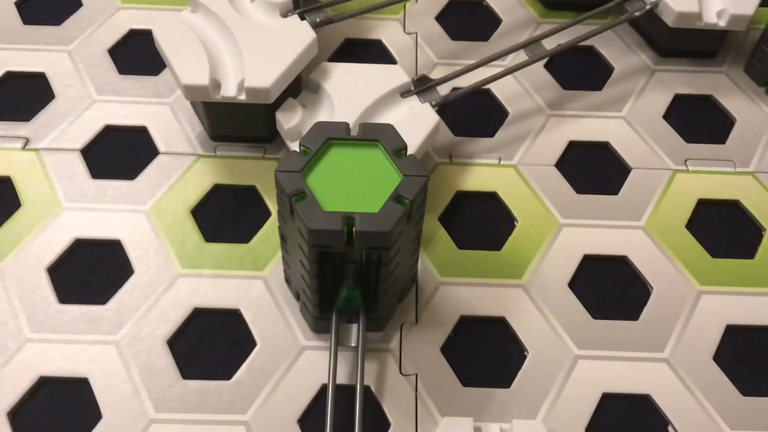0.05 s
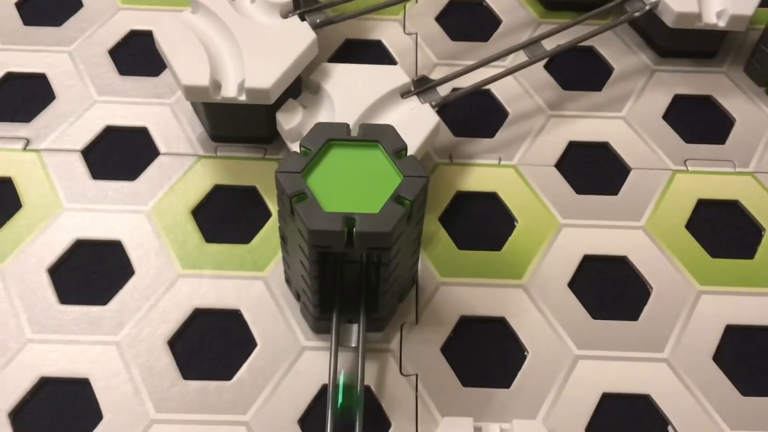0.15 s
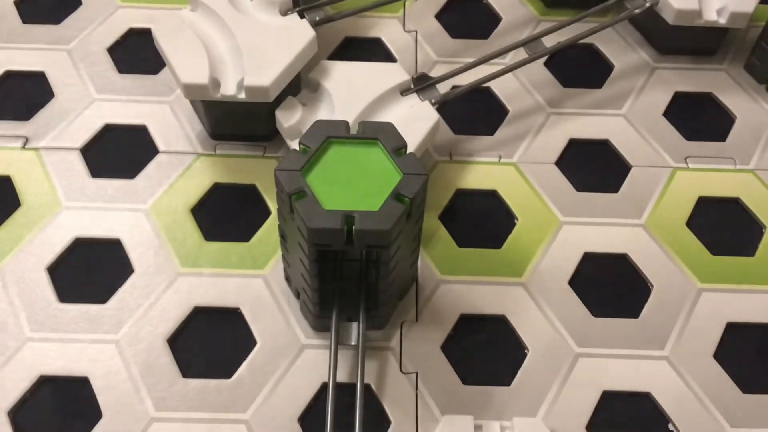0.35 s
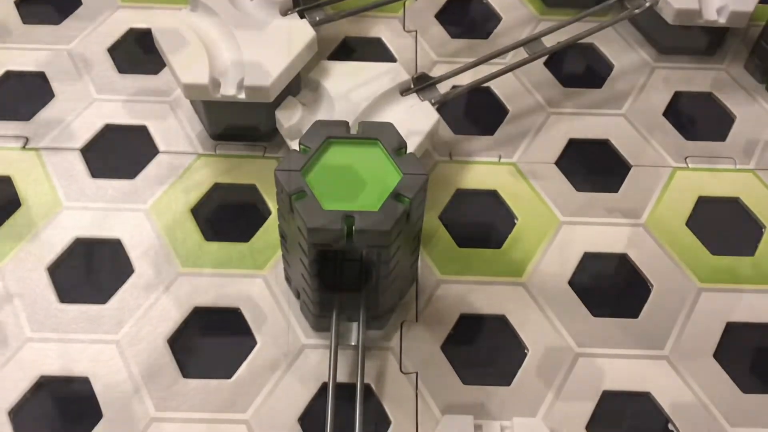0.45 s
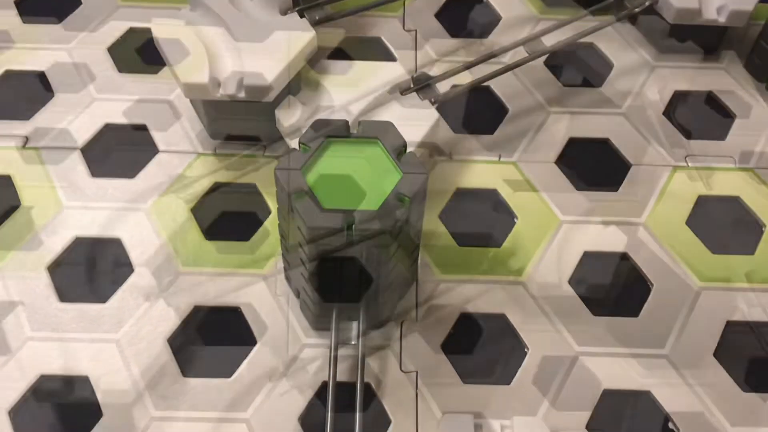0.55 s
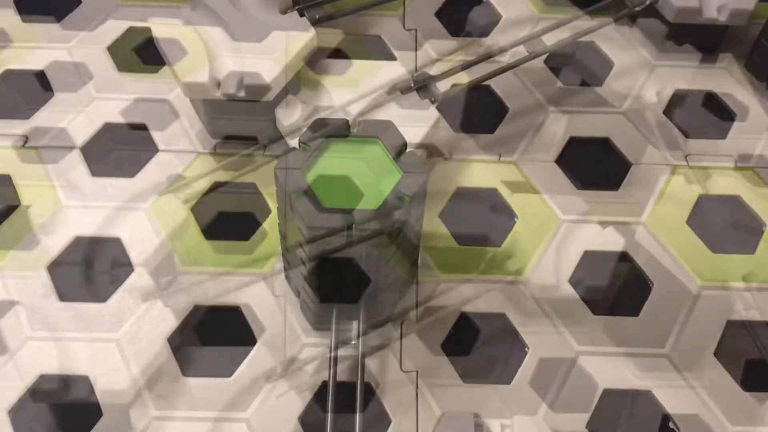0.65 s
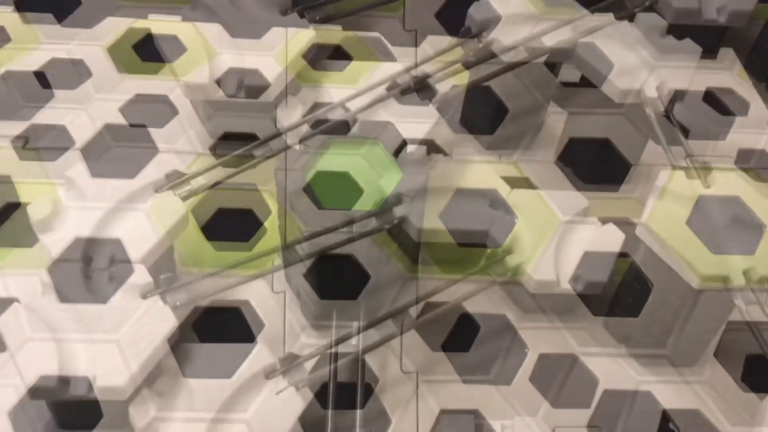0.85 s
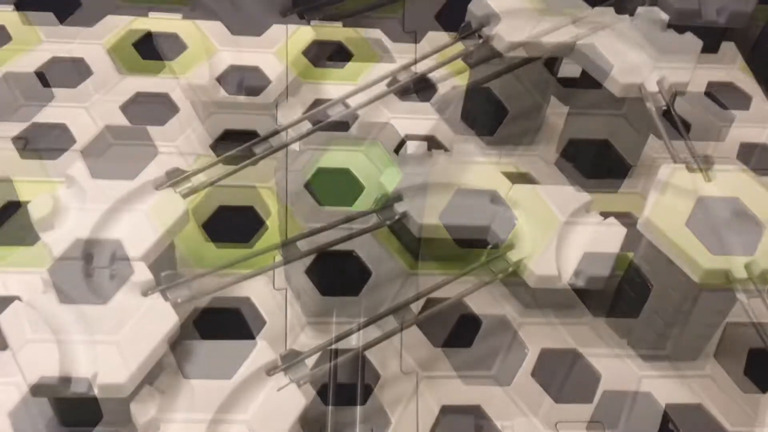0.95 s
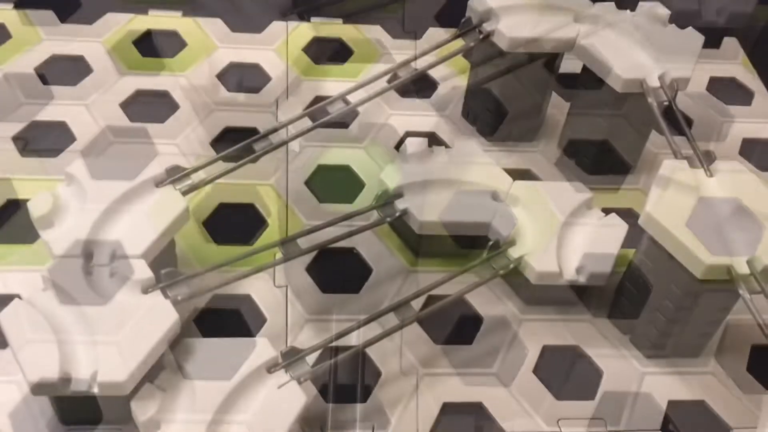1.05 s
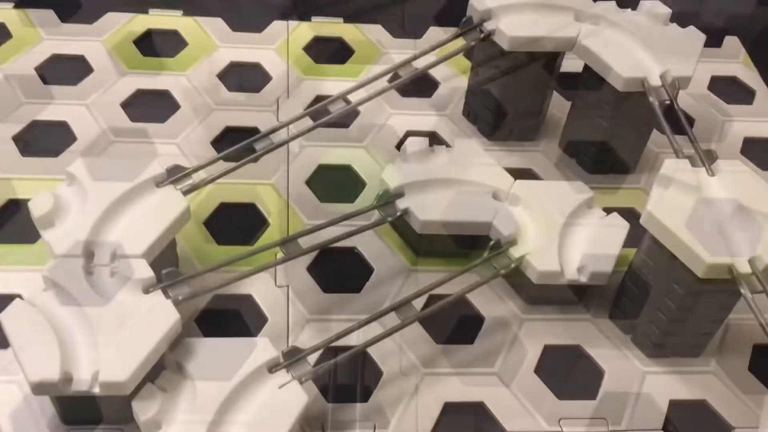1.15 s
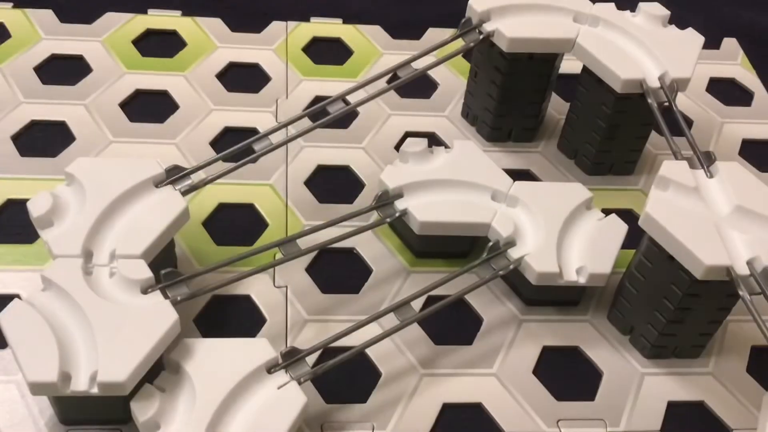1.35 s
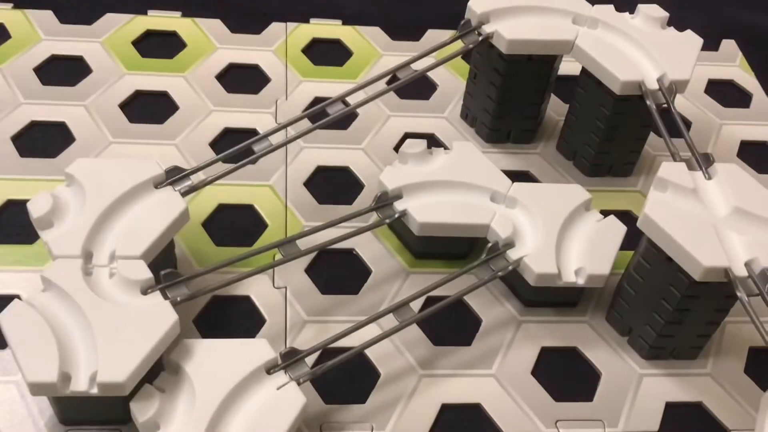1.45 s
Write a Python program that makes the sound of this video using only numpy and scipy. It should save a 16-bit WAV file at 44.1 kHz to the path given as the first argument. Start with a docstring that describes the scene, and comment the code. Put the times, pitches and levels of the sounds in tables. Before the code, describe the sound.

A marble rolls along a plastic track with a fine rattle and a quick run of sharp clacks. It settles with two faint ticks, leaving a low hum, heard close up in a small room.

```python
"""A marble clacks and rattles along a plastic track on a table in a small room.
Each hit on a tile or rail joint rings the plastic; tiny bumps under the marble make the fine rattle
and a hollow rumble. The rails sing softly as it rolls, and it settles with two faint ticks.
The room rings briefly after each clack. A faint whirr comes up late, and a low hum underneath
swells a little at the end."""
import sys
import numpy as np
from scipy import signal
from scipy.fft import rfft, irfft
from scipy.io import wavfile

SR = 44100
rng = np.random.default_rng(int(sys.argv[2]) if len(sys.argv) > 2 else 0)


def master_out(mix):
    """Clip the mix to full scale and print it as 16-bit PCM to the path in sys.argv[1]."""
    frames = np.transpose(np.atleast_2d(mix))
    ceiling = np.clip(frames, -1, 1)
    pcm = np.round(ceiling * 32767).astype(np.int16)
    wavfile.write(sys.argv[1], SR, pcm)


N = 66150
TIME = np.arange(N) / SR
WAVER_HZ = 22.2   # the whirr and the hum flutter in level below this rate


def clacks():
    """The marble hits joints and walls, each with its own ring and hardness."""
    # t/s, ring t60/s, hollow f/Hz, main f/Hz, upper f/Hz, upper resonance gain/dB,
    # then knock, clack, edge and tick level/dB (energy spread over 10 ms)
    hits = [(0.0667, 0.064, 1233, 2806, 3600, 7, -67.5, -52.5, -65, -95.5),
            (0.183, 0.027, 1327, 2227, 5070, 12, -49.5, -39.5, -41.5, -57),
            (0.2025, 0.033, 1250, 2290, 5030, 0.5, -59, -48, -59.5, -63),
            (.214, 0.023, 1470, 3080, 4730, 11.5, -53, -45, -39, -49.5),
            (0.2179, 0.011, 1340, 2880, 3316, 8, -55.5, -35.5, -51.5, -55),
            (0.229, 0.023, 828, 2636, 4140, 14.5, -34.5, -34.5, -39, -62),
            (0.2374, 0.026, 1183, 2490, 4126, 3.5, -54.5, -44.5, -56.5, -57.5),
            (0.282, .012, 1094, 2504, 4160, 3, -48.5, -48, -65, -80.5),
            (.2945, .02, 1195, 2697, 5110, 3, -65, -59.5, -66.5, -64.5),
            (0.3072, 0.012, 1604, 2702, 3572, 13.5, -39.5, -22.5, -39.5, -53),
            (0.3253, .006, 998.5, 2670, 3400, -1, -56.5, -35, -60, -81),
            (0.3341, .011, 1274, 2753, 3510, -2, -54, -30, -51, -76.5),
            (.3418, .012, 1590, 2707, 3680, -4, -60.5, -38.5, -68, -81),
            (0.3537, 0.018, 1204, 2840, 4636, 12.5, -39.5, -37.5, -40.5, -50),
            (0.4198, 0.011, 1180, 3850, 3920, 7.5, -68.5, -49.5, -53.5, -81.5),
            (0.4709, 0.011, 601, 2596, 3440, 3.5, -37, -21, -38.5, -45),
            (0.4827, 0.02, 1290, 2744, 3910, 8, -57.5, -35.5, -46.5, -65.5),
            (0.5363, 0.044, 683, 2950, 5230, 14, -54.5, -49, -72, -73.5),
            (0.7479, 0.021, 683, 2867, 5960, 16, -59, -47.5, -64.5, -81),
            (0.8652, 0.022, 675, 3100, 5950, 6, -65.5, -63.5, -87, -100)]
    out = np.zeros(N)
    for s, t60, hollow_hz, main_hz, upper_hz, upper_db, *levels_db in hits:
        add(out, s, clack(t60, hollow_hz, main_hz, upper_hz, upper_db, levels_db))
    return out


def clack(t60, hollow_hz, main_hz, upper_hz, upper_db, levels_db):
    """One contact snaps and rings the struck part and the track; hardness sets each register's level."""
    # modes of the plastic track: f/Hz, gain/dB, ring time as a multiple of the clack's
    track_modes = [(650, -4, 0.57), (1224, 4.5, 0.57), (1409, -5, 0.72), (2345, -5.5, 0.23), (2816, 2, 1.0),
                   (3230, -1.5, 1.2), (3780, -6, 0.68), (4230, -12, 0.21), (5030, 3, 1.2),
                   (5980, -16.5, 1.6), (8600, -7.5, 0.5), (13600, -19, .7)]
    # knock, clack, edge and tick registers: low f/Hz, high f/Hz
    registers = [(520, 2330), (2180, 3705), (4050, 6105), (7500, 17000)]
    build_up_s, attack_s, snap_t60, scatter_db = 0.000077, 0.00057, 0.007, 2.5
    t = TIME[:SR // 10]
    part_modes = [(hollow_hz, 3), (main_hz, 10.5), (upper_hz, upper_db)]   # f/Hz, gain/dB
    struck_part = sum(from_db(db) * np.sin(2 * np.pi * hz * t) for hz, db in part_modes)
    ring = struck_part * decay(t, t60) * (1 - np.exp(-t / build_up_s))
    for hz, db, length in track_modes:
        strength = from_db(db - scatter_db * rng.standard_normal()) * rng.choice([-1, 1])
        ring += strength * np.sin(2 * np.pi * hz * t) * decay(t, t60 * length)
    noise = band(rng.standard_normal(len(t)), 1390, 6000)
    weak_modes = from_db(15) * noise * decay(t, t60)
    snap = from_db(10) * noise * decay(t, snap_t60)
    ring = (ring + weak_modes + snap) * (1 - np.exp(-t / attack_s))
    voiced = sum(from_db(db) * rms_one(band(ring, low, high, order=4))
                 for (low, high), db in zip(registers, levels_db))
    return np.sqrt(1 / 10) * voiced   # 10 ms worth of energy in a 100 ms sound


def rolling():
    """Dense tiny bumps under the marble make the track rattle and its hollow tiles rumble."""
    # course of the roll: t/s, rattle level/dB, rumble level/dB
    levels = [(0, -58.5, -68.5), (.06, -62.5, -70.5), (.08, -55, -66), (.11, -57.5, -68.5),
              (.18, -55, -65.5), (.222, -44, -57.5), (.24, -38.5, -45), (.272, -50, -49.5), (.29, -50, -44),
              (.32, -51.5, -52.5), (.36, -56.5, -52.5), (.385, -58.5, -60.5), (.425, -59, -63.5),
              (.46, -63, -65), (.5, -51.5, -61.5), (.55, -58.5, -66.5), (.62, -68.5, -72),
              (.72, -100, -100)]
    # colour of the track's rattle: f/Hz, level/dB
    rattle = [(1200, -21.5), (1900, -1.5), (2350, -1.5), (2800, 5), (3600, 0.5), (4400, -10), (5100, -4.5),
              (6000, -14), (7000, -22.5), (10000, -35), (14500, -40.5)]
    # colour of the tiles' rumble: f/Hz, level/dB
    rumble = [(150, -16.5), (350, -10), (550, -11.5), (850, -4), (1050, -7.5), (1300, -3), (1600, -9.5),
              (2200, -6), (4000, -42.5)]
    bumps_per_s, spread_db = 2000, 1.5
    sizes = from_db(spread_db * np.minimum(rng.exponential(1, N), 4)) * rng.choice([-1, 1], N)
    bumps = sizes * (rng.random(N) < bumps_per_s / SR)
    rattle_db, rumble_db = in_time(levels)
    return from_db(rattle_db) * coloured(bumps, rattle) + from_db(rumble_db) * coloured(bumps, rumble)


def rail_rub():
    """The marble rubs a rail: a short swell of friction in one narrow, slightly rising resonance."""
    peak_s, width_s, peak_db, rise_hz_per_s = .417, .015, -48.5, 8100
    t = TIME - peak_s
    swell = from_db(peak_db) * np.exp(-.5 * (t / width_s) ** 2)
    return swell * resonance(3656 + rise_hz_per_s * t, band_hz=330)


def rail_song():
    """Rolling keeps one wavering resonance of the rails sounding until the marble leaves them."""
    # the rails' soft note: t/s, f/Hz, level/dB
    song = [(.06, 1210, -72.5), (.11, 1330, -62.5), (.14, 1260, -69), (.175, 1330, -61), (.22, 1330, -54.5),
            (.3, 1330, -110)]
    hz, db = in_time(song)
    return from_db(db) * resonance(hz, band_hz=190)


def rail_taps():
    """Two light taps of the marble leave the steel rail ringing thinly."""
    # taps on the rail: t/s, level/dB
    taps = [(0.7491, -61.5), (0.8666, -76)]
    # modes of the rail: f/Hz, gain/dB, t60/s
    modes = [(3230, -4, 0.15), (6200, -1, 0.03)]
    out, t = np.zeros(N), TIME[:SR // 4]
    ping = sum(from_db(db) * np.sin(2 * np.pi * hz * t) * decay(t, t60) for hz, db, t60 in modes)
    for s, db in taps:
        add(out, s, from_db(db) * ping)
    return out


def room(x):
    """Quick scatter from the table and tiles, then a diffuse tail that dies faster in the treble."""
    # the room's tail: f/Hz, level/dB, t60/s
    tail = [(300, 0.5, .75), (480, -9, 0.8), (802, -20.5, 0.435), (1500, -19, .5), (2550, -22, 0.79),
            (3320, -16, 0.41), (4600, -23.5, .42), (7900, -5, 0.17), (10600, -22, 0.29), (15000, -23, .2)]
    early_db, early_t60, fade_in_s = -17.5, .07, .005
    t, edges_hz = TIME[:SR * 3 // 4], np.geomspace(250, 16000, 13)
    early = from_db(early_db) * rms_one(decay(t, early_t60))
    white, response = rng.standard_normal((2, len(t))), 0
    for k, (low, high) in enumerate(zip(edges_hz, edges_hz[1:])):
        hz = np.sqrt(low * high)
        late = from_db(at_hz(tail, hz)) * rms_one(decay(t, at_hz(tail, hz, column=2)))
        response += band(white[k % 2], low, high) * np.hypot(late, early)
    response *= (1 - np.exp(-(t / fade_in_s) ** 2)) / np.sqrt(len(t))
    return signal.fftconvolve(x, response)[:N]


def whirr():
    """A faint, wavering whirr comes up near the end, and the table thrums under it."""
    # the whirr's rise: t/s, level/dB
    levels = [(.85, -87.5), (1.1, -79.5), (1.23, -78.5), (1.3, -76.5), (1.5, -77)]
    # colour of the whirr: f/Hz, level/dB
    colour = [(450, -19.5), (600, 11), (720, -5.5), (1200, -2), (1900, -9.5), (2200, -5), (2470, 1),
              (2850, -14.5), (5500, -17.5), (9500, -26.5)]
    thrum_above_db, waver_db = 19, 1.35
    db, = in_time(levels)
    thrum = from_db(thrum_above_db) * resonance(np.full(N, 130), band_hz=73)
    gain = from_db(db + waver_db * slow_noise(WAVER_HZ))
    return gain * (coloured(rng.standard_normal(N), colour) + thrum)


def room_tone():
    """A low room hum drifts in level under a steady faint hiss."""
    # colour of hum and hiss together: f/Hz, level/dB
    colour = [(22, -31.5), (38, -15.5), (55, -1), (90, 0.5), (150, -5), (250, -13), (340, -14.5),
              (440, -23.5), (600, -28), (800, -26.5), (1100, -30.5), (1800, -32), (2500, -35.5),
              (4300, -43.5), (6500, -49.5), (8300, -49.5), (11000, -55), (14000, -51), (15500, -62)]
    # the hum's drift: t/s, level/dB
    levels = [(0, -55.5), (.45, -58), (.58, -58.5), (.69, -62.5), (.85, -57.5), (1.0, -57.5), (1.12, -56.5),
              (1.26, -60), (1.31, -54.5), (1.42, -54.5), (1.5, -60.5)]
    crossover_hz, hiss_gain_db, waver_db = 443.7, -59.5, 0.96
    noise = coloured(rng.standard_normal(N), colour)
    hum = signal.sosfiltfilt(signal.butter(2, crossover_hz, fs=SR, output="sos"), noise)
    hiss = noise - hum
    hum_db, = in_time(levels)
    return from_db(hum_db + waver_db * slow_noise(WAVER_HZ)) * hum + from_db(hiss_gain_db) * hiss


def resonance(hz, band_hz):
    """Noise in one narrow resonance whose centre may move; rms 1."""
    phase = 2 * np.pi * np.cumsum(hz) / SR
    return rms_one(slow_noise(band_hz / 2) * np.cos(phase) + slow_noise(band_hz / 2) * np.sin(phase))


def slow_noise(hz):
    """Random wandering below hz; rms 1."""
    noise = signal.sosfilt(signal.butter(2, hz, fs=SR, output="sos"), rng.standard_normal(2 * N))
    return rms_one(noise[N:])


def coloured(x, spectrum):
    """Give a steady signal a spectrum; rms 1."""
    hz = np.arange(N // 2 + 1) * SR / N
    return rms_one(irfft(rfft(x) * from_db(at_hz(spectrum, hz)), N))


def band(x, low_hz, high_hz, order=2):
    """Causal band-pass."""
    return signal.sosfilt(signal.butter(order, [low_hz, high_hz], "band", fs=SR, output="sos"), x)


def decay(t, t60):
    """A fall of 60 dB in t60 seconds."""
    return np.exp(-np.log(1000) * t / t60)


def from_db(db):
    """Decibels to gain."""
    return 10 ** (np.asarray(db) / 20)


def rms_one(x):
    """Scale to unit rms."""
    return x / np.sqrt(np.mean(x ** 2) + 1e-20)


def in_time(rows):
    """The columns of a curve at every sample."""
    s, *columns = np.transpose(rows)
    return [np.interp(TIME, s, c) for c in columns]


def at_hz(points, hz, column=1):
    """Read a column of a table along log frequency."""
    table = np.array(points)
    return np.interp(np.log(np.maximum(hz, 1)), np.log(table[:, 0]), table[:, column])


def add(out, s, sound):
    """Mix a sound in at time s."""
    start = int(s * SR)
    out[start:start + len(sound)] += sound[:N - start]


def scene():
    """The marble and the room's answer over room tone and whirr, in mono."""
    marble = clacks() + rolling() + rail_rub() + rail_song() + rail_taps()
    return (marble + room(marble) + room_tone() + whirr())[None]


def record(dry):
    """The deepest bass and the top are cut steeply."""
    low_cut_hz, stopband_hz = 42, 16500
    dry = signal.sosfilt(signal.butter(4, low_cut_hz, "high", fs=SR, output="sos"), dry)
    return signal.sosfilt(signal.cheby2(14, 60, stopband_hz, fs=SR, output="sos"), dry)


dry = scene()
out = record(dry)
master_out(out)
```